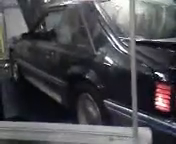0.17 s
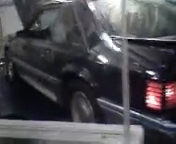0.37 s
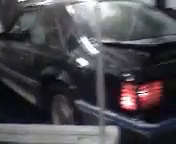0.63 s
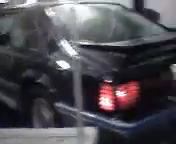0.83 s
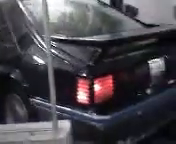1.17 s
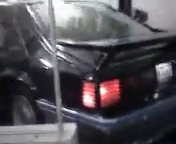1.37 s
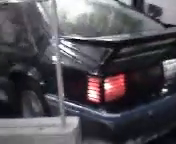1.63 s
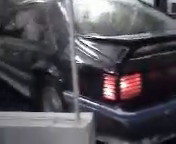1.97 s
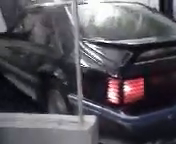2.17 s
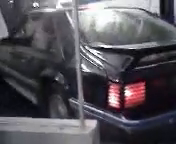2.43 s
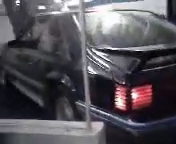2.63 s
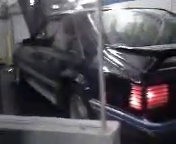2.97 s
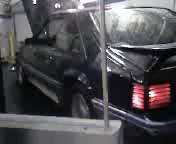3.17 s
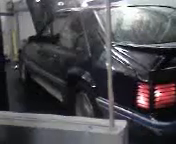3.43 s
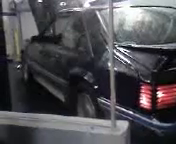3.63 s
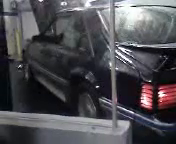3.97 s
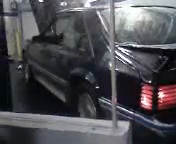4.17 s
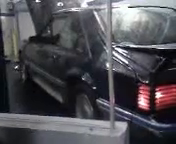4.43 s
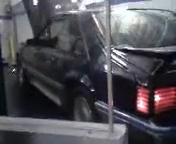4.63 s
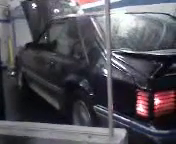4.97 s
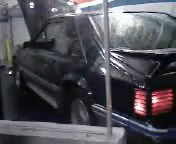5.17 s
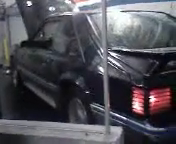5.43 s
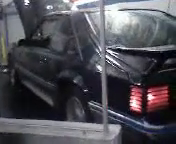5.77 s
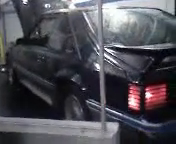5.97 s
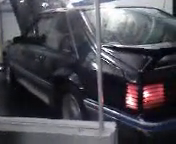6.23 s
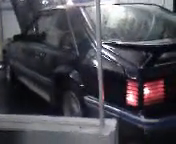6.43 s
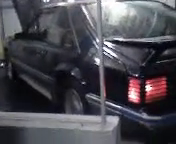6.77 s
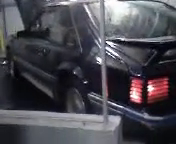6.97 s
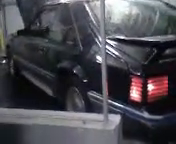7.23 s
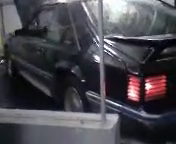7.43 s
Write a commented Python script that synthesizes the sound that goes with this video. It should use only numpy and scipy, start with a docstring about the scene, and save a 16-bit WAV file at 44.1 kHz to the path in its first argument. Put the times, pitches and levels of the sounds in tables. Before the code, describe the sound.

Loud wavering tyre howl on steel rollers climbs in pitch over a deep, raspy V8 exhaust drone that surges to full throttle.

```python
"""A V8 car's exhaust booms as it pulls on a chassis dynamometer in a workshop, heard beside the rear wheel.
Crank orders sweep through the tailpipe resonances over a rasp of pulsed noise; the revs climb throughout,
and the throttle, part open at first and then eased off, is wide open from 2.5 s. The rear tyres sing on steel
rollers: a ring of tread noise that repeats every turn, tread-block tones and wavering whistles. Filtered noise
gives the low gas rumble and the rush of air. A small narrow-band camera hears it."""
import sys
import numpy as np
from scipy import signal
from scipy.fft import rfft, irfft
from scipy.io import wavfile

SR = 44100
rng = np.random.default_rng(int(sys.argv[2]) if len(sys.argv) > 2 else 0)


def log_audio(samples):
    """Write samples as a 16-bit WAV file to the path given in sys.argv[1]."""
    # one column per channel
    frames = np.atleast_2d(samples).T
    # limit to full scale, then quantise
    limited = np.clip(frames, -1, 1)
    pcm = np.round(limited * 32767).astype(np.int16)
    wavfile.write(sys.argv[1], SR, pcm)


N = 334703
TIME = np.arange(N) / SR  # s
FREQ = np.maximum(np.arange(N // 2 + 1) * SR / N, 1)  # Hz, kept above zero for logarithms
TOP_HZ = 4400  # upper edge of the camera's narrow band


def undb(db):
    """Amplitude gain is ten to the power of the level in decibels over twenty."""
    return 10 ** (np.asarray(db) / 20)


def unit(x):
    """Normalization: divide by the root mean square to make it 1."""
    return x / np.sqrt(np.mean(x ** 2))


def curves(table):
    """Linear interpolation of each column of (time, ..) rows, sample by sample."""
    s, *columns = np.transpose(table)
    return [np.interp(TIME, s, c) for c in columns]


def slope(points, at=FREQ):
    """Spectral envelope: gain of (frequency, level) points joined on a logarithmic frequency axis."""
    f, db = np.transpose(points)
    return undb(np.interp(np.log(at), np.log(f), db))


def resonance(hz, width):
    """Response of a damped second-order resonance, with gain 1 at its centre."""
    return 1 / (1 + 1j * (FREQ / hz - hz / FREQ) * hz / width)


def modal_power(modes, width_scale):
    """Power response of modes added as energies, each mode a resonance passed twice."""
    return sum(undb(2 * db) * abs(resonance(hz, width_scale * width)) ** 4 for hz, width, db in modes)


def colour(x, response):
    """Linear filtering: multiply the spectrum by a response, then bring it to rms 1."""
    return unit(irfft(rfft(x) * response, N))


def noise():
    """White noise: equal mean power at all frequencies."""
    return rng.standard_normal(N)


def walk(rate):
    """Slow random modulation of rms 1: chance values, `rate` a second, joined by straight lines."""
    steps = rng.standard_normal(4096)
    return unit(np.interp(TIME * rate, np.arange(len(steps)), steps))


def crank_tone(cycles, order, flutter):
    """A rotation harmonic: phase follows the turning, and complex modulation shakes its size and phase."""
    shake = 1 + flutter * (walk(22) + 1j * walk(22))
    turn = np.exp(2j * np.pi * (order * cycles + rng.random()))
    return unit(np.real(shake * turn))


def gas_rumble():
    """Broadband turbulence: gas noise booms in the deep muffler chamber."""
    # spectral envelope of the rumble: (frequency [Hz], relative level [dB])
    chamber = [(15, -8.5), (30, -5.5), (55, -3), (80, -4.5), (100, -2.5), (130, -2.5), (180, 2), (225, 2),
               (280, 2.5), (335, 6), (420, -8), (600, -45)]
    # slow course of the rumble: (time [s], level [dB])
    rumble_level = [(0, -41), (2.2, -42.5), (2.75, -36.5), (4.25, -34.5), (4.55, -30.5), (4.8, -37),
                    (6.55, -36), (6.951, -29), (7.25, -37), (7.59, -35)]
    (level_db,) = curves(rumble_level)
    unsteadiness_db = 1.7 * walk(9)
    return undb(level_db + unsteadiness_db) * colour(noise(), slope(chamber))


def air_rush(octaves, throttle):
    """Flow noise: air from fans and tailpipes grows louder with engine speed and gas flow."""
    # spectral envelope of the rush: (frequency [Hz], relative level [dB])
    rush_shape = [(200, -25), (450, 4.5), (580, 0.5), (700, -2), (900, -2), (1200, -6), (2000, -4.5),
                  (3300, -10), (4400, -47)]
    base_db, db_per_octave = -28, 6  # level at reference speed and wide-open throttle; rise per doubling
    load_db = 2  # more gas leaves the tailpipes at wide-open throttle
    level_db = base_db + db_per_octave * octaves + load_db * (throttle - 1)
    unsteadiness_db = 2.1 * walk(8)
    return undb(level_db + unsteadiness_db) * colour(noise(), slope(rush_shape))


def workshop(x, t60=0.66, wet_db=-11.5):
    """Reverberation: hard walls add a dense echo that decays by 60 dB in `t60` seconds."""
    t = TIME[:SR]
    tail = rng.standard_normal(SR) * undb(-60 * t / t60) * (t > .006)
    echo = irfft(rfft(x) * rfft(tail / np.linalg.norm(tail), N), N)
    return unit(x + undb(wet_db) * echo)


def patchy(x, patchy_db, rate, count=26):
    """Band-wise amplitude modulation: overlapping bands swell and fade on their own, the treble most."""
    centres = np.linspace(700, TOP_HZ, count)  # Hz
    spectrum = rfft(x)
    total = 0
    for hz, share in zip(centres, np.eye(count)):
        band = irfft(spectrum * np.interp(FREQ, centres, share), N)
        depth_db = patchy_db * min(hz / 3000, 1) ** 2
        total = total + band * undb(depth_db * walk(rate))
    return total


def whistles(turns, waver=.03, rate=75):
    """Air pumping: grooves between unequal tread blocks whistle with random frequency modulation."""
    # broken, wavering whistles: (multiple of a wheel turn, relative level [dB])
    groove_tones = [(96, -10), (122, -17), (135, -13), (160, -20.5), (193, -11)]
    step = np.diff(turns, prepend=0)
    total = 0
    for k, db in groove_tones:
        wavering_turns = np.cumsum(step * (1 + waver * walk(rate)))
        total = total + undb(db) * walk(28) * np.sin(2 * np.pi * k * wavering_turns)
    return total


def tread(turns, size=8192):
    """Periodic excitation: an irregular tread ring repeats every turn, with fresh random scuffing on top."""
    # spectral envelope of tread noise: (multiple of a wheel turn, relative level [dB])
    tread_pattern = [(40, -0.5), (60, 5.5), (75, -3), (86, 4), (96, 2), (104, 3.5), (112, -0.5), (122, 2),
                     (135, 3.5), (148, 0.9), (178, -1.7), (195, -0.5), (215, -3.5), (350, -3)]
    # strongest tread-block tones: (multiple of a wheel turn, level before the common cut [dB])
    block_tones = [(96, -15), (113, -20), (114, -16), (131, -32.5)]
    scuff_db, block_cut_db = 3.5, 3.5

    place = turns * size
    count = int(place[-1]) // size + 2
    ring = np.tile(rng.standard_normal(size), count)
    contact = ring + undb(scuff_db) * rng.standard_normal(len(ring))
    # filter by position round the wheel, so that the pattern's pitch follows the speed
    multiples = np.maximum(np.arange(len(ring) // 2 + 1) / count, 1)
    contact = irfft(rfft(contact) * slope(tread_pattern, multiples) * (multiples < size / 20))
    rolling = unit(np.interp(place, np.arange(len(contact)), contact))
    blocks = sum(undb(db - block_cut_db) * crank_tone(turns, round(k), flutter=0.68) for k, db in block_tones)
    return rolling + blocks


def tyres(cycles, octaves, throttle):
    """Source and resonator: two rear tyres, slipping unequally, sing through a horn and ringing rollers."""
    # the wedge between tyre and roller works as a horn: (frequency [Hz], relative level [dB])
    horn = [(400, -22), (850, -21), (1150, -12), (1330, -7.5), (1600, -5.5), (1850, -2), (2120, -1.5),
            (2280, -4.5), (2570, -7.5), (2750, -9), (3300, -10), (3700, -23), (4000, -28.5), (4400, -57.5)]
    # ringing of rollers and wheel wells: (frequency [Hz], width before scaling [Hz], relative level [dB])
    rings = [(802.7, 11, -6.5), (1090, 100, -11), (1232, 80, -6.5), (1766, 180, -5), (1889, 42, 3.5),
             (2086, 90, -0.5), (2600, 95, -12)]
    # brief peaks that overload the camera, heard as faint clipping ticks: (time [s], added level [dB])
    overload_peaks = [(4.705, 3.5), (5.783, 0.5), (5.84, 5), (6.14, 1), (6.813, 3.5), (7.131, 7),
                      (7.219, 4.5)]
    near_ratio, far_ratio, far_db = .6026, .6036, -5.0  # wheel turns per engine cycle; level of the far tyre
    base_db, db_per_octave = -16.5, 9  # level at reference speed and wide-open throttle; rise per doubling
    load_db = 1.1  # drive torque at wide-open throttle makes the tread slip and sing louder
    peak_s = 0.008  # time from a peak's centre to 1/e of its dB

    near = near_ratio * cycles
    contact = tread(near) + undb(far_db) * tread(far_ratio * cycles) + whistles(near)
    # the contact patch squirms under load, so the song never holds still
    song = patchy(workshop(contact), patchy_db=3.0, rate=18)
    body = np.sqrt(slope(horn) ** 2 + modal_power(rings, width_scale=0.77))
    peak_db = sum(db * np.exp(-((TIME - s) / peak_s) ** 2) for s, db in overload_peaks)
    level_db = base_db + db_per_octave * octaves + load_db * (throttle - 1)
    return undb(level_db) * colour(song, body) * undb(peak_db)


def engine_orders(cycles, rpm, throttle):
    """Order tracking: cycle harmonics rise with the revs and boom as they cross pipe resonances."""
    # engine orders: (multiple of the four-stroke cycle, relative level eased off [dB],
    # at part throttle [dB], wide open [dB])
    order_mix = [(10, -11.5, -7, -10), (11, -9.5, -9.5, -11), (12, -18, -6, -15), (13, -21.5, -9, -24.5),
                 (14, -15.5, -11.5, -16.5), (15, -25.5, -21.5, -17.5), (16, -5.5, -10, -5.5),
                 (17, -15.5, -10.5, -18), (18, -6.5, -6, -12.5), (19, -19.5, -14, -13.5),
                 (20, -18, -15.5, -14), (21, -3, -11, -11.5), (22, -9, -13.5, -14), (23, -3, -10, -18),
                 (24, -3, -10, -13.5), (25, -10, -10, -9), (27, -10.5, -10.5, -12)]
    # tailpipe response: (frequency [Hz], relative level [dB])
    pipe = [(220, -26), (242, -18.5), (255, -2.5), (265, -8.5), (279, -1), (298, 2.5), (313, -5), (335, -8),
            (360, 0.5), (410, -2), (445, -1.5), (485, -10), (525, -4), (590, -14.5), (800, -17.5)]
    # unevenness of combustion: (throttle [0 to 1], flutter before the booming orders' share [ratio])
    unevenness = [(0, .2), (.5, .3), (1, .4)]
    boom_orders, boom_share = (10, 11, 16, 18, 24), .45  # booming orders keep only this share of the flutter

    flutter = np.interp(throttle, *np.transpose(unevenness))
    orders = 0
    for k, *mix_db in order_mix:
        k = round(k)
        hz = k * rpm / 120
        order_db = np.interp(throttle, [0, .5, 1], mix_db)
        share = boom_share if k in boom_orders else 1
        orders = orders + undb(order_db) * slope(pipe, hz) * crank_tone(cycles, k, flutter * share)
    return orders


def gas_rasp(cycles):
    """Pulsed turbulence: noise swells at each firing and is coloured by the muffler resonances."""
    # muffler resonances: (frequency [Hz], width before scaling [Hz], relative level [dB])
    muffler = [(306.4, 51, -9), (337, 48, -9), (387, 82, -4), (424.6, 40, 3), (518, 27, -3)]
    # eight puffs a cycle, bunched once a cycle by the uneven firing of each bank
    firing = 1 + 0.48 * np.cos(2 * np.pi * 8 * cycles)
    bunching = 1 + 0.27 * np.cos(2 * np.pi * cycles)
    gas = noise() * firing * bunching * undb(1.3 * walk(12))
    return colour(gas, np.sqrt(modal_power(muffler, width_scale=1.2)))


def exhaust(cycles, rpm, throttle):
    """Superposition of tonal engine orders and gas noise, both driven by how hard the exhaust blows."""
    # how hard the exhaust blows: (time [s], level [dB])
    effort = [(0, -27.5), (.75, -25.5), (1.3, -27.5), (1.7, -27.5), (2.17, -30.5), (2.45, -24.5),
              (2.8, -18), (3.4, -18.5), (4.1, -16), (4.601, -13), (5.3, -21), (5.8, -17), (6.399, -20.5),
              (6.95, -17), (7.59, -23.5)]
    # barks of gas from the tailpipes: (time [s], level added to the rasp [dB])
    barks = [(3.24, 8), (3.61, 8), (3.851, 10.5), (4.23, 8.5), (4.68, 5), (5.061, 11), (5.53, 5.5),
             (5.77, 12), (6.8, 5.5), (6.92, 1.5), (7.23, 10)]
    orders_db, rasp_db = -1.5, -10.5  # relative to the effort
    bark_s = 0.028  # time from a bark's peak to 1/e of its dB

    (effort_db,) = curves(effort)
    bark_db = sum(db * np.exp(-((TIME - s) / bark_s) ** 2) for s, db in barks)
    orders = undb(orders_db) * engine_orders(cycles, rpm, throttle)
    rasp = undb(rasp_db + bark_db) * gas_rasp(cycles)
    # the whole flow surges a little
    surge = undb(1.0 * walk(16))
    return surge * undb(effort_db) * (orders + rasp)


def scene():
    """Kinematic coupling: exhaust and tyres follow the crankshaft, two revolutions to a four-stroke cycle."""
    # engine speed: (time [s], speed [rpm])
    speed = [(0.0, 2496), (0.75, 2562), (1.5, 2623), (2.25, 2676), (3.0, 2787), (3.75, 2903), (4.5, 3023),
             (5.25, 3160), (6.0, 3362), (6.75, 3515), (7.59, 3741)]
    # the driver's foot: (time [s], throttle [0 eased off, 0.5 part open, 1 wide open])
    foot = [(1.0, .5), (1.398, 0.095), (2.3, 0), (2.5, 1)]
    (rpm,), (throttle,) = curves(speed), curves(foot)
    cycles = np.cumsum(rpm / 120) / SR
    octaves = np.log2(rpm / 3000)  # speed relative to a reference of 3000 rpm
    background = gas_rumble() + air_rush(octaves, throttle)
    mix = background + tyres(cycles, octaves, throttle) + exhaust(cycles, rpm, throttle)
    return mix[None]


def record(dry):
    """Saturation and band limiting: the camera rounds peaks, keeps the low band and clips what is still high."""
    rounded = 1.15 * np.tanh(dry / 1.15)
    narrow = signal.sosfilt(signal.ellip(12, .1, 95, TOP_HZ, fs=SR, output="sos"), rounded)
    # peaks that still pass the limit clip with a tiny tick, itself low-passed at 15.8 kHz
    clipped = np.clip(narrow, -.7, .7)
    return signal.sosfilt(signal.ellip(8, .2, 70, 15800, fs=SR, output="sos"), clipped)


dry = scene()
out = record(dry)
log_audio(out)
```